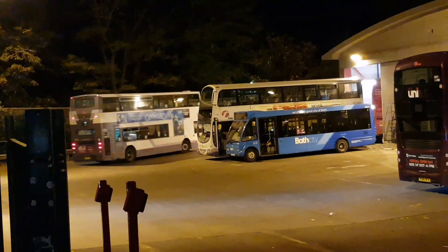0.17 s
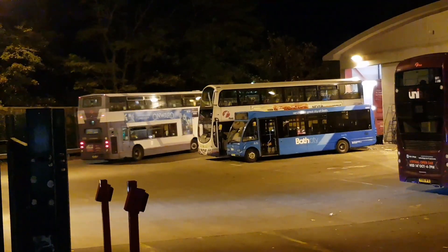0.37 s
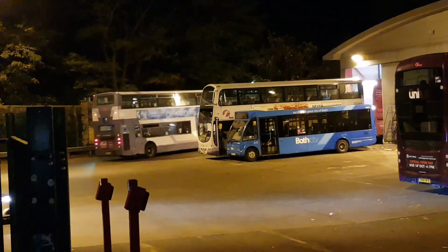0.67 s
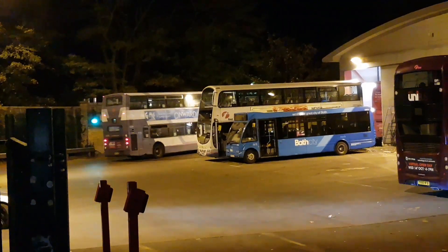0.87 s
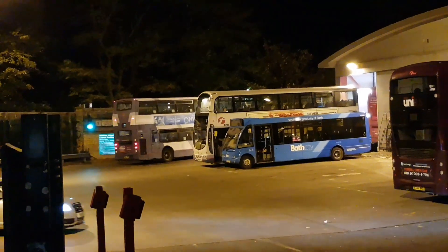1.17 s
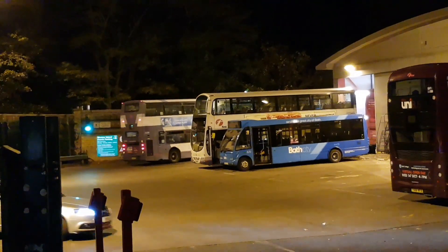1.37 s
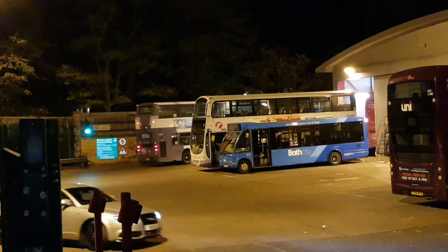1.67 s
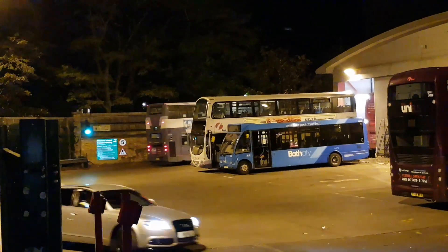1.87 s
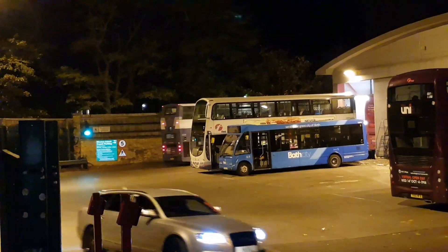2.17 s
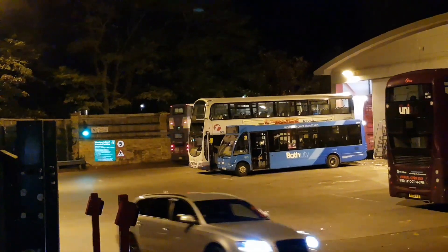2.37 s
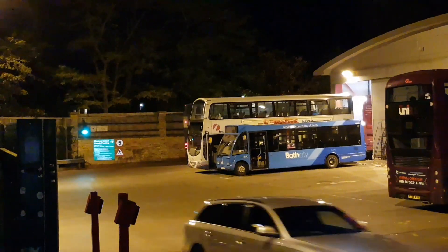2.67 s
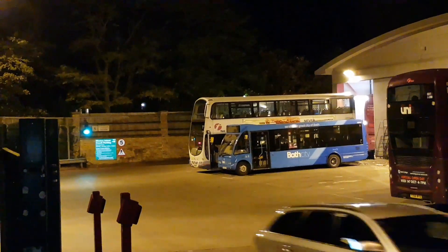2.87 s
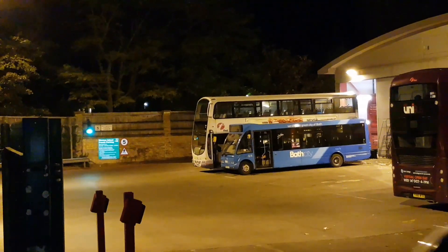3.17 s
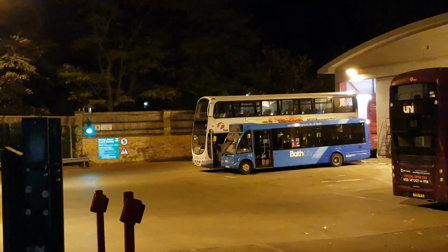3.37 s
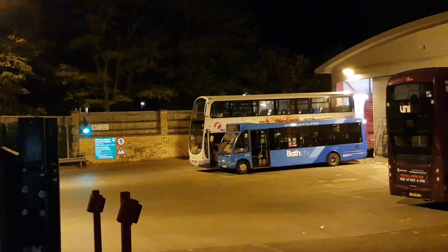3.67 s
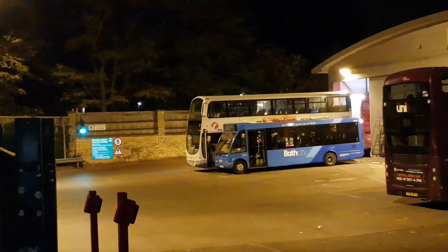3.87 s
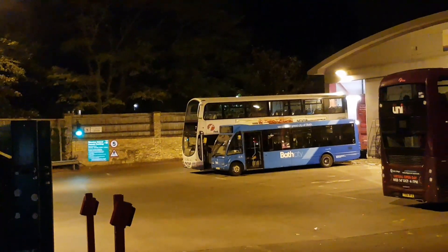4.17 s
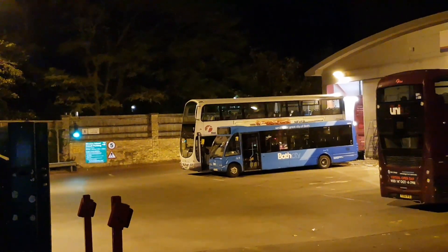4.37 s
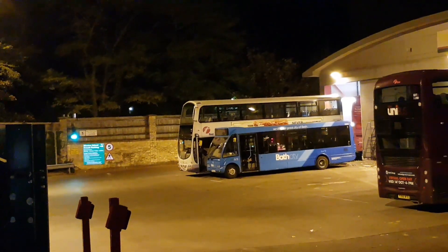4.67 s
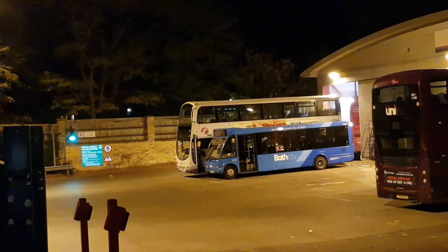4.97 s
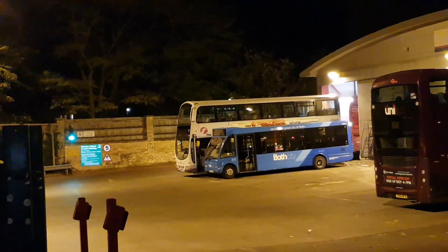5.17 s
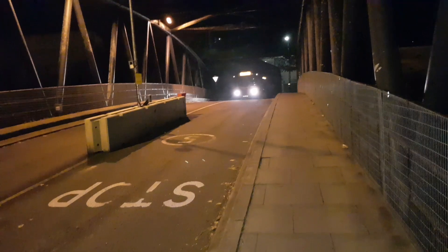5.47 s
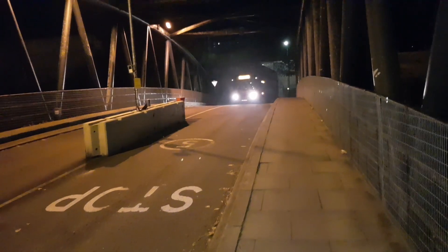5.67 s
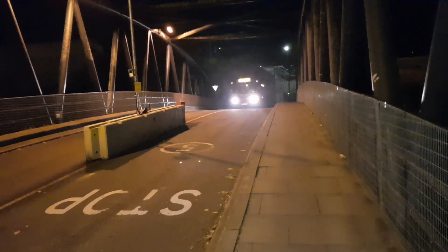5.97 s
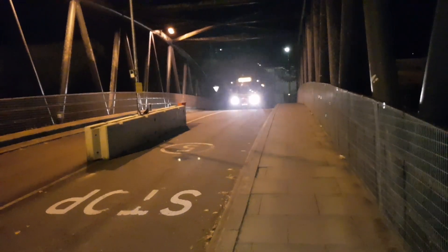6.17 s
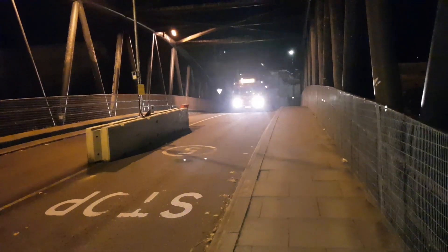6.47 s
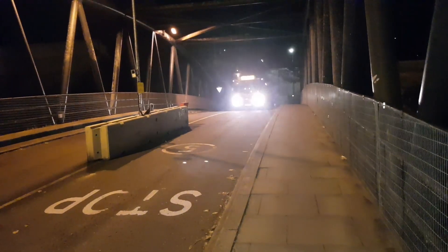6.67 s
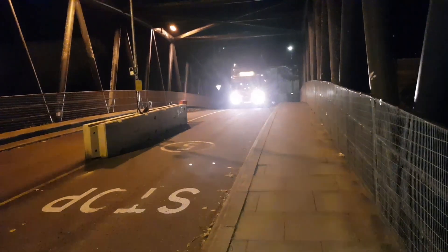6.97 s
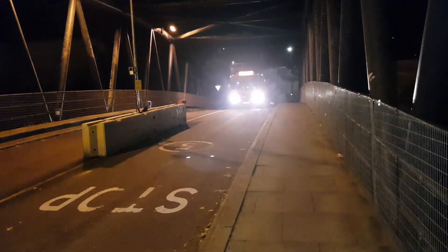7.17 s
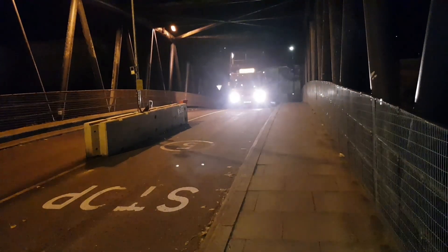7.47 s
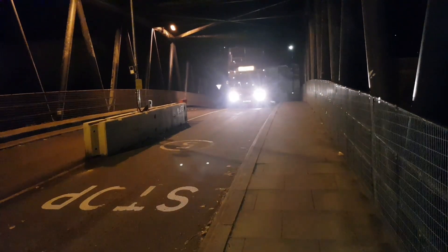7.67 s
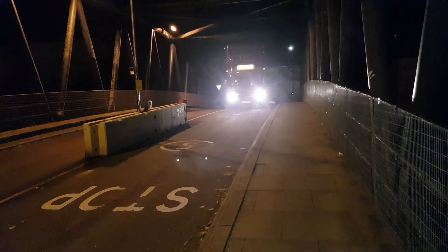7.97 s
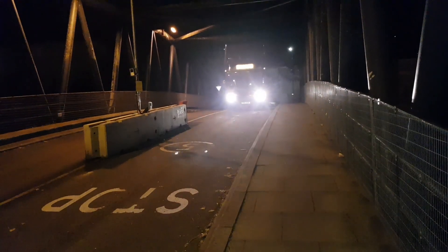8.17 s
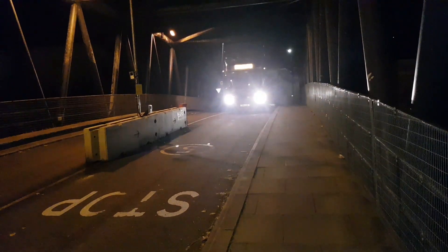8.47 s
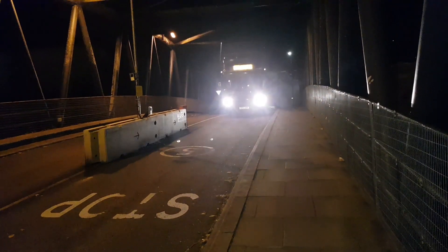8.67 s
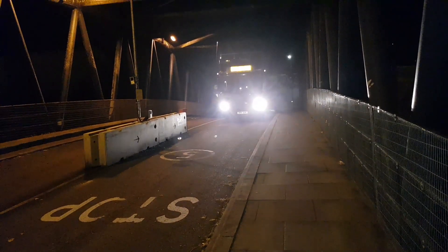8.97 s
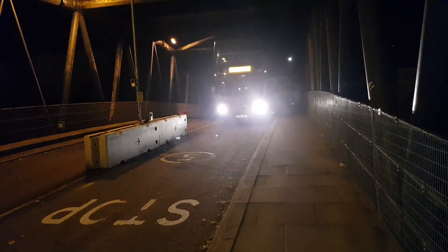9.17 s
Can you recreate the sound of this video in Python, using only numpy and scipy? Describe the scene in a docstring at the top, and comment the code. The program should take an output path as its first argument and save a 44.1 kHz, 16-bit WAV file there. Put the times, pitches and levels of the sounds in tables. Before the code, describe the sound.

Low gusts of wind rumble on the microphone as a diesel bus hums away across a depot. A car accelerates past at close range, left to right, its turbo whistling and exhaust booming, with dull wheel thumps and a few tiny brake squeaks afterwards. The sound cuts to a bridge, where another bus comes slowly nearer with a throbbing exhaust and gear whine, drops in pitch, lets out air and picks up again.

```python
"""Night at a bus depot, in a breeze. A diesel double-decker drives off to park, its cooling fan droning.
A car sweeps past close by, left to right, with a whistling turbo and a booming exhaust; wheels thud and
brakes squeak. After an instant of silence, a second bus comes slowly over a bridge, exhaust throbbing
and gears whining. Its engine drops with a gear change, air hisses out, and it pulls again."""
import sys
import numpy as np
from scipy import signal
from scipy.fft import rfft, irfft
from scipy.io import wavfile
from scipy.ndimage import uniform_filter1d

SR = 44100
rng = np.random.default_rng(int(sys.argv[2]) if len(sys.argv) > 2 else 0)


def wrap_up_sound(samples):
    """Save the sound to the file named by the first command line argument, as 16-bit audio."""
    columns = np.atleast_2d(samples).T
    # keep every value between -1 and 1, then stretch to whole-number steps
    tamed = np.clip(columns, -1, 1)
    steps = np.round(tamed * 32767).astype(np.int16)
    wavfile.write(sys.argv[1], SR, steps)


N = 411441
T = np.arange(N) / SR
FRAME_T = np.arange(N // 256 + 5) * 256 / SR  # noise is shaped on a grid of short time frames...
BIN_HZ = np.fft.rfftfreq(1024, 1 / SR)  # ...and narrow frequency bins

# strength of the wind on the microphone: t/s, relative level/dB
GUSTS = [(0, -52), (.35, -52), (.7, -40), (.82, -31), (1.3, -30), (1.44, -43), (1.7, -34), (1.8, -44),
         (1.87, -37), (2.1, -35), (2.55, -41.5), (3.2, -37.5), (3.65, -33), (4.05, -38), (4.75, -38.5),
         (5.02, -50.5), (5.2, -36.5), (5.45, -37), (5.52, -33.5), (6.12, -29.5), (6.25, -42), (6.45, -39),
         (6.78, -37), (6.92, -40), (7.08, -45), (7.2, -37), (7.6, -54), (8.6, -65), (9.1, -40), (9.33, -50)]
# the wind's colour (how strong its low and high parts are): f/Hz, relative level/dB
WIND_COLOUR = [(25, -17), (55, 10), (100, 2), (180, -5.5), (320, -22), (700, -28), (2000, -76)]
# wheels hitting kerbs and joints: t/s, f/Hz, relative level/dB
THUDS = [(1.66, 95, -21), (1.714, 140, -19.5), (1.838, 100, -23), (1.909, 99.9, -19), (2.026, 154, -22),
         (3.372, 421, -15), (3.402, 115, -18), (3.64, 62, -16.5), (5.627, 100, -21), (6.122, 78, -20),
         (6.964, 80, -19.5), (7.092, 109.8, -23.5)]
# colour of the rattle after a thud: f/Hz, relative level/dB
RATTLE_COLOUR = [(30, -17), (70, 4), (160, 6), (400, -11), (1500, -26), (6000, -60)]
# brake squeaks: t/s, length/s, f/Hz, level/dB
SQUEAKS = [(4.414, 0.046, 10180, -64), (4.732, 0.049, 5300, -60.5), (5.155, 0.045, 5560, -57)]
# the three bands of vehicle noise (rumble, roar, hiss): lowest f/Hz, highest f/Hz
BANDS = [(40, 190), (480, 2600), (7500, 13000)]

# the depot bus's three bands: cruising level/dB, rise with fan rate/(dB per Hz), rise as it turns/dB
DEPOT_NOISE = [(-35.5, 0.01, 4), (-36, 0.0268, 0.5), (-57, 0.07, 1)]
# colour of that noise: f/Hz, relative level/dB
DEPOT_COLOUR = [(25, -35), (52, -10), (110, -1.5), (330, -5), (480, -17), (660, -10.5), (1250, -26.5),
                (1530, -22.5), (1750, -25.5), (2050, -21.5), (2850, -22.5), (3200, -31.5), (3700, -26.5),
                (6000, -36), (11800, -41), (14500, -65)]
# how alike it is at the two ears: f/Hz, likeness (1 = same, 0 = unrelated, -1 = opposite)
DEPOT_LIKENESS = [(100, 0.97), (260, 0.85), (750, 0.8), (1300, 0.18), (2100, 0.68), (2800, 0.69),
                  (4500, 0.09), (9000, 0.074)]
# how often a fan blade passes, sagging with a gear change: t/s, f/Hz
FAN_SPEED = [(0, 257), (.35, 267.1), (.55, 262), (.67, 248.8), (.87, 221.5), (1.1, 215), (1.35, 211.5),
             (1.62, 229), (2, 236), (5.48, 232)]
# the fan's main note, swelling and sinking as the bus moves: t/s, relative level/dB
FAN_DRONE = [(0.0, -38), (0.24, -28.5), (0.36, -43.5), (0.68, -21), (0.77, -28), (1.1, -26), (1.33, -19.5),
             (1.66, -42), (2.16, -23.5), (2.29, -32), (2.49, -20), (2.89, -35.5), (2.99, -27.4),
             (3.19, -41), (3.34, -29), (3.74, -45), (3.84, -28.5), (4.62, -46.5), (4.8, -32.5), (4.93, -28),
             (5.2, -41.5), (5.45, -48)]
# the fan's whine, at three times that pitch: t/s, level/dB
FAN_WHINE = [(0, -43.5), (.25, -39.5), (.34, -50), (.44, -39.5), (.72, -39.5), (1.0, -45.5), (1.3, -41),
             (1.52, -35.5), (1.56, -42), (1.63, -34), (1.68, -45), (1.74, -34.5), (1.83, -42),
             (2.02, -32.5), (2.14, -39.5), (2.5, -39), (4.4, -59)]
# its weaker overtones: multiple of the pitch, level/dB, change as the bus turns/dB
FAN_OVERTONES = [(2, -47, -1.5), (4, -47, -5.5), (5, -54.5, 0), (6, -60, 6), (7, -55, 0)]

# the bridge bus's three bands: coasting level/dB, rise under throttle/dB, change as it nears/(dB per s)
BRIDGE_NOISE = [(-40.5, 5, -0.67), (-43.5, 2, -0.39), (-67, 0, 0.8)]
# colour of that noise: f/Hz, relative level/dB
BRIDGE_COLOUR = [(25, -25), (48, 1.5), (100, -4.5), (135, -9.5), (200, -7.5), (280, -9), (335, -15),
                 (410, -13), (500, -24.5), (600, -17), (700, -14.5), (1200, -19.5), (1750, -26.5),
                 (2700, -28.5), (5000, -37.5), (8500, -46.5), (12000, -48.5), (14500, -58)]
# how alike it is at the two ears: f/Hz, likeness
BRIDGE_LIKENESS = [(100, 0.99), (380, 0.91), (750, 0.83), (1300, 0.61), (1700, -0.13), (2100, 0.63),
                   (3000, -0.053), (5000, -0.12), (9000, -0.079)]
# hollow peaks in the engine noise, from sound bouncing off the road: f/Hz, width/Hz, boost/dB
ROAD_ECHO_PEAKS = [(720, 380, 4), (1100, 110, 6), (1540, 130, 6.5), (2057, 250, 7.5), (3380, 500, -2.5)]
# metal that rings only in the hard pull before the gear change: f/Hz, width/Hz, boost/dB
LOAD_RINGING = [(626, 150, 3.5), (995, 31, 3), (1990, 74, -0.5), (2490, 130, 4), (2800, 120, 3.5)]
# how often the bridge bus's engine fires: t/s, f/Hz
BRIDGE_FIRING = [(5.5, 71.95), (5.8, 73.85), (6.15, 77.4), (6.4, 70.55), (6.7, 66.04), (6.95, 63.53),
                 (7.25, 59), (7.62, 51.03), (8.15, 52.3), (8.6, 55.03), (9.33, 54.66)]
# its exhaust throb at that rate: t/s, relative level/dB
THROB = [(5.5, -35.5), (6.16, -32.5), (6.25, -50), (6.34, -37), (6.62, -30.5), (6.79, -33), (6.87, -48),
         (7.12, -49), (7.23, -29), (7.27, -52), (7.32, -45), (7.37, -29), (7.5, -52), (7.71, -32.5),
         (7.96, -30.5), (8.09, -36), (8.2, -30.5), (8.5, -31), (8.72, -27), (8.88, -35), (9.12, -43),
         (9.17, -34), (9.3, -39)]
# chug of its unequal cylinders: multiple of the crankshaft's turning rate, coasting level/dB
CHUG = [(4, -53), (5, -47), (8, -58), (12, -53.5)]
# its gearbox whine, one list for each gear: t/s, f/Hz
GEAR_PITCHES = [
    [(5.4, 367.8), (6.15, 388), (6.5, 376.6), (7.0, 353)],
    [(7.38, 268.2), (7.8, 276.2), (8.2, 277.6), (8.6, 286), (9.45, 294)],
]
# its thin whistle: t/s, f/Hz, level/dB
WHISTLE = [(5.5, 12170, -75), (6.1, 11900, -74.5), (6.35, 12000, -72), (7.2, 12000, -86)]
# puffs of air it lets out: t/s, length/s, level/dB
AIR_PUFFS = [(6.95, 0.16, -60.5), (7.25, 0.55, -58.5)]
# their colour: f/Hz, relative level/dB
AIR_COLOUR = [(2000, -20), (5000, -4), (9000, -7), (11500, 2), (13500, -4), (14500, -11)]

# the car's three bands: base level/dB, share of distance loss, tailpipe boost/dB, change once past/dB
CAR_NOISE = [(-32.5, 0.25, 4.5, -4.5), (-28, 1, 1, -2), (-44, 0.73, 3, -16)]
# colour of that noise: f/Hz, relative level/dB
CAR_COLOUR = [(25, -34), (58, 2.5), (130, -5), (330, -2.5), (540, -8.5), (720, -5.5), (1050, -10.5),
              (1350, -11.5), (1800, -19), (3300, -26.5), (5000, -30), (9400, -36), (11000, -33),
              (14500, -37.5)]
# how alike it is at the two ears: f/Hz, likeness
CAR_LIKENESS = [(100, 1), (260, 0.85), (750, 0.85), (1300, 0.67), (2300, 0.29), (4000, 0.14), (9000, 0.12)]
# the car's direction: t/s, delay at the left ear/ms
CAR_LAG = [(1.5, -0.19), (2, 0.013), (2.5, 0.01), (3, 0.16), (3.5, 0.36), (3.8, 0.47), (4.3, 0.43),
           (5.4, 0.3)]
# how often its engine fires as it pulls, shifts up, pulls again and coasts: t/s, f/Hz
CAR_FIRING = [(1.8, 136.7), (2.42, 164.4), (2.7, 158.5), (2.88, 136.9), (3.3, 146.2), (3.5, 138.2),
              (3.68, 132.2), (3.85, 127.7), (4.04, 123.2), (4.45, 110)]
# colour of its tyres scrubbing: f/Hz, relative level/dB
SCRUB_COLOUR = [(1500, -25), (3000, -3), (4000, 3), (5200, -6), (7500, -7), (12000, -26)]
# rasp of its engine under throttle: t/s, level/dB
RASP = [(1.25, -68), (1.45, -51), (1.6, -41.5), (1.8, -43), (2.05, -43), (2.3, -42), (2.55, -39),
        (2.85, -49), (3.3, -70)]
# the rasp's colour: f/Hz, relative level/dB
RASP_COLOUR = [(900, -28), (1400, 6), (1750, -4), (1980, 10), (2150, 3), (2350, 1), (2800, 3), (3200, -5),
               (4200, -7), (6000, -13), (10000, -24)]
# the turbo's whistle until the driver lifts off: t/s, f/Hz
TURBO_PITCH = [(1.5, 8750), (1.92, 12620), (2.08, 14380), (2.25, 15300), (2.4, 14400), (2.56, 13350),
               (2.76, 13100), (3.04, 14100), (3.28, 14850), (3.43, 14500)]
# the turbo dumping its spare air: t/s, length/s, level/dB
TURBO_DUMP = [(3.4, .3, -42)]
# that puff's colour: f/Hz, relative level/dB
DUMP_COLOUR = [(1500, -30), (4400, 0), (5050, 9), (5500, -2), (6300, 4), (9200, -14), (11000, 0),
               (14000, -6)]
# how the exhaust pipe lifts or dulls each pitch: f/Hz, boost/dB
PIPE_BOOST = [(112, 3.5), (122, -14), (129, 5.5), (133, -6), (137, 2), (143, -3), (162, 7.5), (243, -4),
              (250, -1), (255, 13.5), (260, 5.5), (263, 14), (267, 11), (271, 3), (296, 8), (322, 11),
              (345, 2), (360, 6), (365, 15), (370, 15), (376, 9.5), (393, 6.5), (402, 2.5), (430, 4.5),
              (480, -7)]
# how much the exhaust note flutters: t/s, roughness (0 = smooth)
EXHAUST_ROUGHNESS = [(2, .8), (2.3, 0.26), (2.65, 0.46), (2.9, 0.7), (3.5, 0.95), (3.64, 0.3), (3.92, 0.3),
                     (4.0, .08), (4.07, 0.09), (4.2, .8)]
# gas rushing out of the tailpipe: t/s, level/dB
GAS_RUSH = [(3.1, -57), (3.35, -33), (3.7, -27.5), (4.05, -34), (4.35, -35.5), (4.6, -54)]
# its colour: f/Hz, relative level/dB
GAS_COLOUR = [(300, -27), (380, -4.5), (425, 0), (455, -10), (500, -27), (900, -60)]

DEPOT_END_S, BRIDGE_START_S = 5.463, 5.498
TURN_S = (1.1, 2)  # the depot bus turns its rear this way
LIFT_S, PULL_S = (6.12, 6.25), (8.24, 8.52)  # the bridge bus's throttle closes, then opens again


def amp(db):
    """Turns decibels into a factor to multiply by."""
    return 10 ** (np.asarray(db) / 20)


def evened(x):
    """Scales a signal to an average power of 1."""
    return x / np.sqrt(np.mean(abs(x) ** 2) + 1e-20)


def curves(rows, t=T):
    """One curve for each column after the times, joining the points with straight lines."""
    times, *columns = np.transpose(rows)
    return [np.interp(t, times, column) for column in columns]


def spectrum(points):
    """Spreads a table of frequencies and values over all the bins."""
    hz, value = np.transpose(points)
    return np.interp(np.log(BIN_HZ + 1), np.log(hz), value)[:, None]


def slide(span, t=T):
    """Goes evenly from 0 to 1 over a span of time."""
    return np.clip((t - span[0]) / (span[1] - span[0]), 0, 1)


def fade_in(start, end):
    """Rises from 0 to 1 with power growing evenly."""
    return np.sqrt(slide((start, end)))


def bump(centre, width, x=T):
    """A smooth rise to 1 and back around a centre."""
    return np.exp(-((x - centre) / width) ** 2)


def drift(rate_hz, size=16384):
    """A smooth random wobble, mostly slower than the given rate."""
    hz = np.fft.rfftfreq(size, T[-1] / size)
    slow = irfft(rfft(rng.standard_normal(size)) / (1 + (hz / rate_hz) ** 4))
    return np.interp(T, np.linspace(0, T[-1], size), evened(slow))


def angle(hz):
    """How far something has turned, in radians, at a changing rate."""
    return 2 * np.pi * np.cumsum(hz) / SR


def tone(hz, db, lag_ms, rough, flutter_hz, apart=0.13):
    """A note that echoes make flutter: `rough` at both ears together, `apart` at each on its own."""
    shared, left, right = (drift(flutter_hz) + 1j * drift(flutter_hz) for _ in range(3))
    flutter = 1 + rough * shared + apart * np.array([left, right])
    flutter /= np.sqrt(1 + 2 * rough ** 2 + 2 * apart ** 2)
    phase = angle(hz) - np.pi * hz * lag_ms * 1e-3 * np.array([[1], [-1]])
    return np.sqrt(2) * amp(db) * (flutter * np.exp(1j * phase)).real


def noise(gain, lag_ms, likeness):
    """Stereo noise shaped over bins and frames, coming from one direction amid echoes."""
    a, b, c, d = rng.standard_normal((4, len(BIN_HZ), len(FRAME_T)))
    left, echoes = a + 1j * b, c + 1j * d
    lead = np.exp(2j * np.pi * BIN_HZ[:, None] * lag_ms * 1e-3)
    same = np.clip(likeness, -1, 1)
    right = same * lead * left + np.sqrt(1 - same ** 2) * echoes
    _, sound = signal.istft(np.array([left, right]) * gain, nperseg=1024, noverlap=768)
    return np.sqrt(1.5) * sound[:, :N]


def rush(level_db, colour, likeness):
    """Noise of one colour at a steady or changing level."""
    return evened(noise(amp(spectrum(colour)), 0, likeness)) * amp(level_db)


def wind():
    """Gusts buffet each side of the microphone separately; the strongest comes from the right."""
    lumps_db = 2.6 * np.array([drift(15), drift(28)])
    side_db = 2.2 * bump(5.8, 0.3) * np.array([[-1], [1]])
    return rush(curves(GUSTS)[0], WIND_COLOUR, likeness=0) * amp(lumps_db + side_db + 1.15)


def thuds(decay_s=0.013):
    """A wheel hits an edge: a low push that dies quickly, with a short rattle after it."""
    out = np.zeros((2, N))
    rattle = rush(-11.5, RATTLE_COLOUR, likeness=0.56)
    for start, hz, db in THUDS:
        age = np.maximum(T - start, 0)
        onset = np.minimum(age * hz * 2, 1)
        push = np.sin(2 * np.pi * hz * age) * np.exp(-age / decay_s)
        out += amp(db) * onset * (1.25 * push + rattle * np.exp(-age / (2 * decay_s)))
    return out


def brakes():
    """Brake pads catch and sing for an instant."""
    out = np.zeros((2, N))
    for start, length, hz, db in SQUEAKS:
        swell = np.sin(np.pi * slide((start, start + length)))
        out += swell * tone(np.full(N, hz), db, lag_ms=0.31, rough=2.5, flutter_hz=329.8)
    return out


def air_valve(puffs, colour, open_s=0.093, shut_s=0.089):
    """A valve opens, air hisses out, and it shuts."""
    gain = np.zeros(N)
    for start, length, db in puffs:
        shutting = np.exp(-np.maximum(T - start - length, 0) / shut_s)
        gain += amp(db) * slide((start, start + open_s)) * shutting
    return gain * rush(0, colour, likeness=0.1)


def vehicle_noise(levels, colour_db, lag_ms, likeness, patchy_db):
    """Rumble, roar and hiss each follow their own level; swirling air makes them patchy."""
    centres = [np.sqrt(lo * hi) for lo, hi in BANDS]
    shape_db = colour_db
    for (lo, hi), level_db, share in zip(BANDS, levels, np.eye(3)):
        in_band = (BIN_HZ > lo) & (BIN_HZ < hi)
        band_db = 10 * np.log10(np.sum(amp(colour_db[in_band]) ** 2, axis=0))
        shape_db = shape_db + spectrum(list(zip(centres, share))) * (level_db - band_db)
    patches = uniform_filter1d(rng.standard_normal(shape_db.shape), size=4, axis=0)
    patches = evened(uniform_filter1d(patches, size=18, axis=1))
    sound = noise(amp(shape_db + patchy_db * patches), lag_ms, spectrum(likeness))
    return sound * amp(0.42 * drift(22) + 0.12 * drift(4))


def knock(firing_hz, depth, uneven):
    """Makes engine noise clatter: it swells at each firing, and more for one cylinder of the six."""
    phase = angle(firing_hz * (1 + 0.024 * drift(15.3)))
    return evened(1 + depth * np.cos(phase) + uneven * np.cos(phase / 6))


def cooling_fan(hz):
    """Blades chop the air into a drone, fading overtones and a whine that comes and goes."""
    drone_db = curves(FAN_DRONE)[0] + 0.27
    drone = tone(hz, drone_db, lag_ms=-0.035, rough=0.17, flutter_hz=27, apart=0.077)
    turned, blocked_db = slide(TURN_S), -18 * slide((2.3, 4.4))
    overtones = sum(
        tone(multiple * hz, db + turn_db * turned + blocked_db, lag_ms=-0.11, rough=0.95, flutter_hz=15.4)
        for multiple, db, turn_db in FAN_OVERTONES)
    whine = tone(3 * hz, curves(FAN_WHINE)[0], lag_ms=-0.079, rough=0.55, flutter_hz=19, apart=0.14)
    return drone + overtones + whine


def depot_bus(cruise_hz=236):
    """The fan drones over the engine that drives it; the engine is soon lost behind parked buses."""
    fan_hz, = curves(FAN_SPEED)
    firing_hz = 0.447 * fan_hz
    near = 1 - slide((1.34, 2.74))
    fan = cooling_fan(fan_hz)
    exhaust = tone(firing_hz, -45.5, lag_ms=-0.08, rough=0.33, flutter_hz=10)
    faster_hz = curves(FAN_SPEED, FRAME_T)[0] - cruise_hz
    turned = slide(TURN_S, FRAME_T)
    levels = [db + per_hz * faster_hz + turn_db * turned for db, per_hz, turn_db in DEPOT_NOISE]
    engine = vehicle_noise(levels, spectrum(DEPOT_COLOUR), -0.052, DEPOT_LIKENESS, patchy_db=1.85)
    clatter = engine * knock(firing_hz, depth=0.081, uneven=0.065)
    return fan + exhaust * near + clatter * np.sqrt(near)


def throttle(t=T):
    """How hard the bridge bus's engine works, from 0 to 1."""
    return 1 - slide(LIFT_S, t) + slide(PULL_S, t)


def gear_whine(pitch, fade_s=0.13):
    """One gear whines, fading in as it takes the load and out as it lets go."""
    start, end = pitch[0][0], pitch[-1][0]
    engaged = np.clip(np.minimum(T - start, end - T) / fade_s, 0, 1)
    return engaged * tone(curves(pitch)[0], -48.3, lag_ms=0.02, rough=0.65, flutter_hz=18)


def peaks_db(peaks, shift=1):
    """Rounded boosts around the listed pitches; `shift` multiplies all those pitches."""
    return sum(db * np.exp(-2 * ((BIN_HZ[:, None] - hz * shift) / width) ** 2) for hz, width, db in peaks)


def bridge_engine():
    """Engine noise sounds hollow as it bounces off the road, and harsher until the throttle closes."""
    shift = np.interp(FRAME_T, [6, 8.3], [0.97, 1.04])  # the echo's peaks rise in pitch as the bus nears
    echo_db = peaks_db(ROAD_ECHO_PEAKS, shift)
    load = 1 - slide(LIFT_S, FRAME_T)
    harsh_db = spectrum([(700, -4.5), (2000, 1.5), (2700, 0.5), (3400, 0), (5500, 2.5),
                         (9000, -2), (12000, -1)])
    colour_db = spectrum(BRIDGE_COLOUR) + echo_db + load * (peaks_db(LOAD_RINGING) + harsh_db)
    levels = [db + pull_db * throttle(FRAME_T) + db_per_s * (FRAME_T - BRIDGE_START_S)
              for db, pull_db, db_per_s in BRIDGE_NOISE]
    heave_db = 0.14 * (curves(THROB, FRAME_T)[0] + 39.5)
    lumps_db = 1.3 * np.interp(FRAME_T, T, drift(20))
    levels[0] += heave_db + lumps_db  # the rumble follows the throb, in uneven lumps
    return vehicle_noise(levels, colour_db, 0, BRIDGE_LIKENESS, patchy_db=1.63)


def bridge_exhaust(hz):
    """Firings throb at 1, 2 and 3 times their rate; the second note booms as the bus pulls again."""
    pull_db = 1.5 * throttle()
    first_db = curves(THROB)[0] - 0.8
    second_db = -47 + pull_db + 11 * slide((8.4, 8.92))
    third_db = -49.5 + pull_db + 5.5 * bump(210, 30, 3 * hz)  # the silencer rings near 210 Hz
    return sum(tone(multiple * hz, db, lag_ms=0.05, rough=rough, flutter_hz=12, apart=0.045)
               for multiple, db, rough in [(1, first_db, 0.072), (2, second_db, 0.15), (3, third_db, 0.8)])


def chug(firing_hz):
    """Unequal cylinders add notes that beat against the throb and make it uneven."""
    crank_hz = firing_hz / 3
    return sum(tone(multiple * crank_hz, db + 3.5 * throttle(), lag_ms=0.05, rough=0.88, flutter_hz=7)
               for multiple, db in CHUG)


def bridge_bus():
    """A diesel changes gear: throb, whine, a thin whistle, hollow clatter and hissing air."""
    firing_hz, = curves(BRIDGE_FIRING)
    exhaust = bridge_exhaust(firing_hz)
    whine = sum(gear_whine(pitch) for pitch in GEAR_PITCHES)
    whistle = tone(*curves(WHISTLE), lag_ms=0.02, rough=1.5, flutter_hz=110, apart=1.5)
    engine = bridge_engine()
    return (exhaust + chug(firing_hz) + whine + whistle + air_valve(AIR_PUFFS, AIR_COLOUR)
            + engine * knock(firing_hz, depth=0.086, uneven=0.042))


def distance_db(t=T, closest_s=3.4, closest_m=3.2, speed_m_per_s=5.28):
    """Sound spreads out, so the car is quieter before and after its closest point."""
    return -10 * np.log10(1 + (speed_m_per_s * (t - closest_s) / closest_m) ** 2)


def road_noise():
    """The car's tyres and engine swell as it nears and sink as it leaves."""
    facing = bump(3.7, 0.32, FRAME_T)  # the tailpipe points this way
    behind = slide((3.24, 4.64), FRAME_T)  # the body hides the engine
    levels = [db + share * distance_db(FRAME_T) + pipe_db * facing + behind_db * behind
              for db, share, pipe_db, behind_db in CAR_NOISE]
    # from afar, sound bouncing off the ground cancels the lower middle pitches
    far_db = spectrum([(150, -3), (650, -6), (1000, -0.5), (1500, 1), (2400, 3.5), (3700, 1),
                       (8000, 1.5), (14500, -0.5)])
    colour_db = spectrum(CAR_COLOUR) + slide((3.6, 4.6), FRAME_T) * far_db
    return vehicle_noise(levels, colour_db, curves(CAR_LAG, FRAME_T)[0], CAR_LIKENESS, patchy_db=2.01)


def turbo(lag_ms, spin_down_s=1.05, fade_db_per_s=36):
    """The turbo spins up to a fuzzy whistle, then dumps its air and slows as the driver lifts off."""
    coasting_s = np.maximum(T - TURBO_PITCH[-1][0], 0)
    hz = curves(TURBO_PITCH)[0] * np.exp(-coasting_s / spin_down_s)
    spin_up_db = -17 * (1 - slide((1.5, 2.5)))
    db = -47 + spin_up_db - fade_db_per_s * coasting_s + 2.2 * drift(14)
    heard = (T > 1.5) * (1 - slide((3.7, 3.98)))
    whistle = tone(hz, db, lag_ms, rough=1.8, flutter_hz=195, apart=2.8)
    return heard * whistle + air_valve(TURBO_DUMP, DUMP_COLOUR)


def car_exhaust(hz, lag_ms, growl_depth=0.11):
    """Gas rushes out, and three notes boom in turn as they glide through pitches the pipe rings at."""
    hidden = slide((4.055, 4.1))
    in_view = slide((3.21, 3.37)) - hidden  # the tailpipe is loudest in plain view
    clutch_db = -15 * bump(2.81, 0.083)  # a dip for the gear change
    db = -36 + 0.66 * distance_db() + clutch_db + 6.5 * in_view
    rough, = curves(EXHAUST_ROUGHNESS)
    notes = np.zeros((2, N))
    for multiple in (1, 2, 3):
        pipe_db = np.interp(multiple * hz, *np.transpose(PIPE_BOOST))
        blocked_db = -3.5 * (multiple - 1) * hidden
        notes += tone(multiple * hz, db + pipe_db + blocked_db, 0.38 * lag_ms, rough,
                      flutter_hz=31.6, apart=0.2)
    growl = (1 + growl_depth * drift(83)) / np.sqrt(1 + growl_depth ** 2)  # uneven firings
    heard = fade_in(1.8, 2.1) * (1 - fade_in(4.48, 4.56))
    gas = rush(curves(GAS_RUSH)[0], GAS_COLOUR, likeness=0.77)
    return notes * growl * heard + gas


def car():
    """The car crosses from left to right, its engine rasping and its tyres scrubbing as it steers in."""
    firing_hz, = curves(CAR_FIRING)
    lag_ms, = curves(CAR_LAG)
    road = road_noise() * knock(firing_hz, depth=0.052, uneven=0.054) * fade_in(1.68, 2.37)
    rasp = rush(curves(RASP)[0], RASP_COLOUR, likeness=0.81) * knock(firing_hz, depth=0.17, uneven=0.16)
    scrub = rush(-43, SCRUB_COLOUR, likeness=0.36) * bump(2.4, 0.3)
    return road + rasp + scrub + turbo(lag_ms) + car_exhaust(firing_hz, lag_ms)


def scene():
    """The depot, an instant of silence, then the bridge; wind blows and wheels thud at both."""
    background = wind() + thuds()
    depot = background + depot_bus() + car() + brakes()
    bridge = background + bridge_bus()
    return depot * (T < DEPOT_END_S) + bridge * (T >= BRIDGE_START_S)


def record(dry, low_cut_hz=38, high_cut_hz=14650):
    """The microphone drops the deepest rumble, then a steep filter drops the highest hiss."""
    low_cut = signal.butter(4, low_cut_hz, "high", fs=SR, output="sos")
    high_cut = signal.firwin(511, high_cut_hz, window=("kaiser", 9), fs=SR)
    return signal.oaconvolve(signal.sosfilt(low_cut, dry), high_cut[None], "same")


dry = scene()
out = record(dry)
wrap_up_sound(out)
```